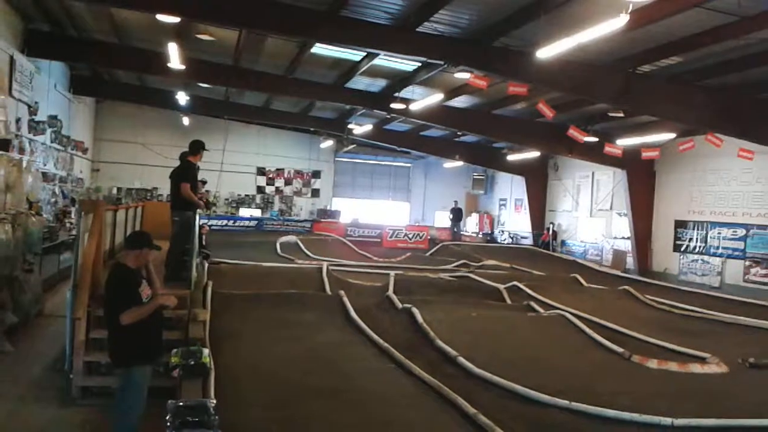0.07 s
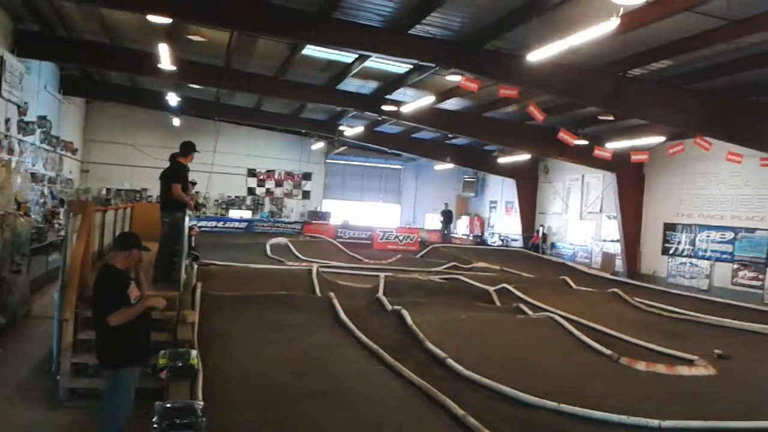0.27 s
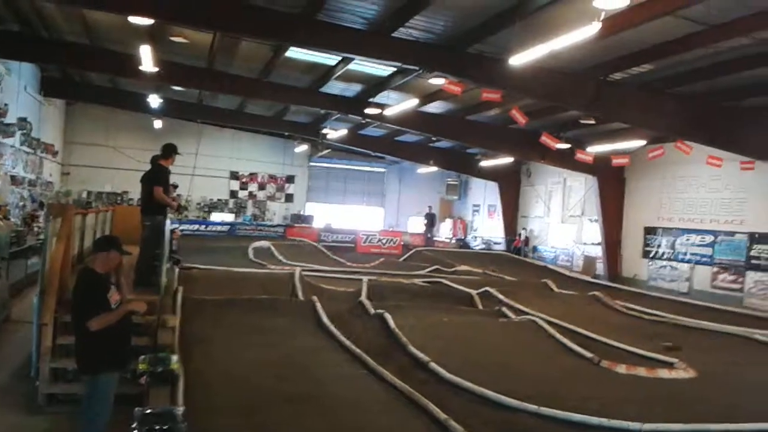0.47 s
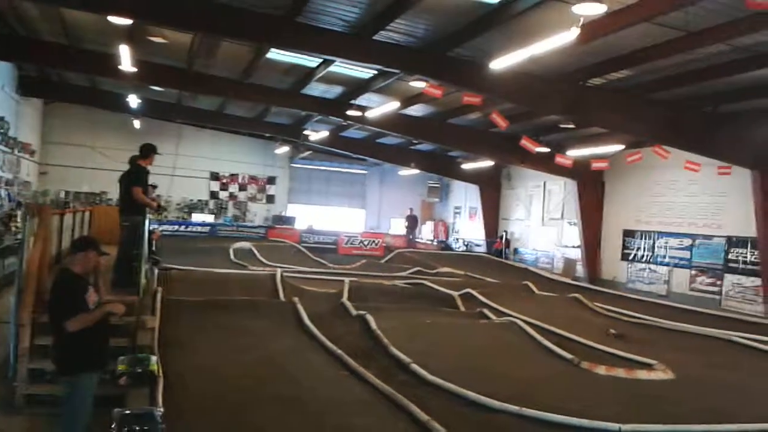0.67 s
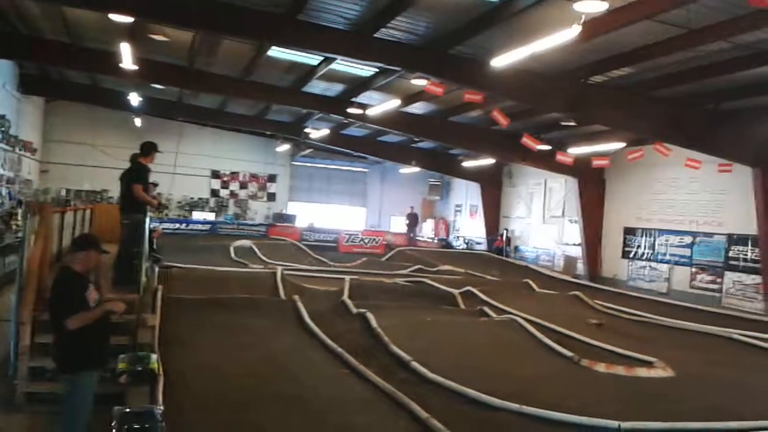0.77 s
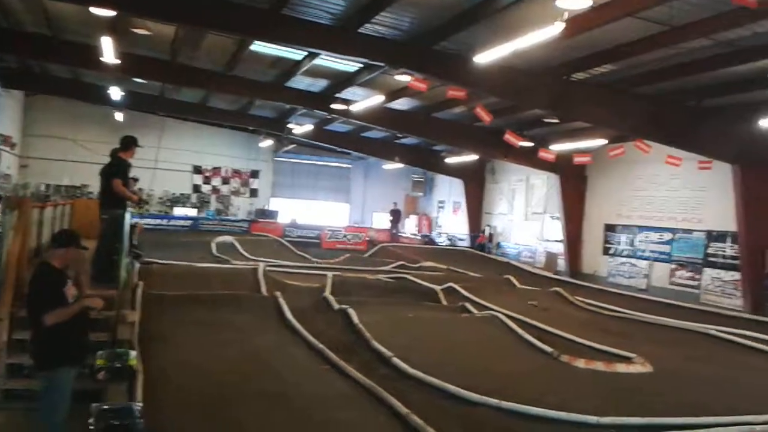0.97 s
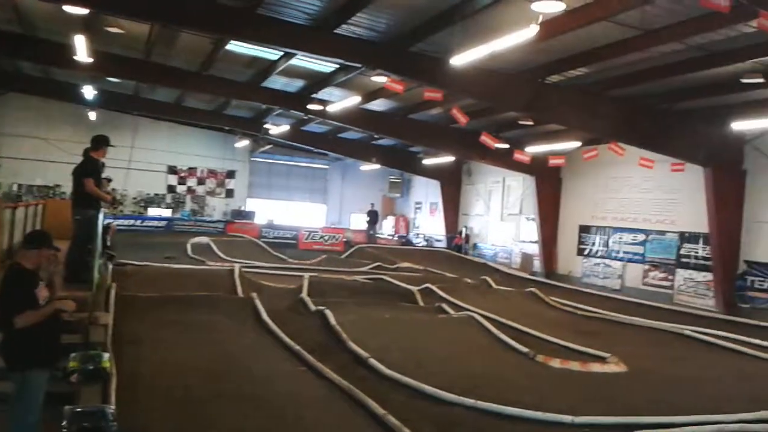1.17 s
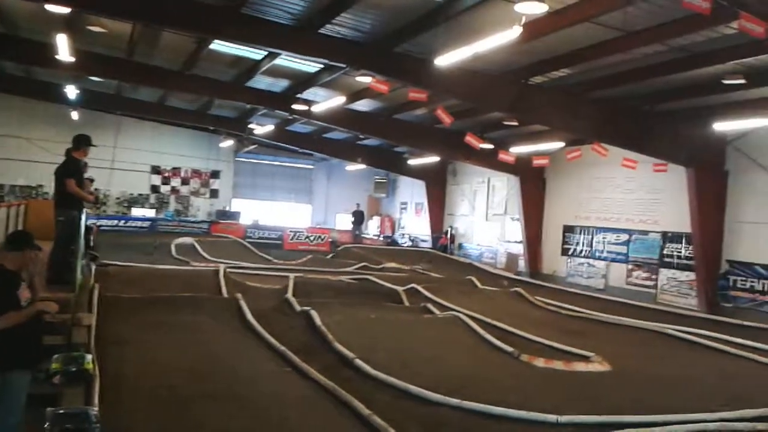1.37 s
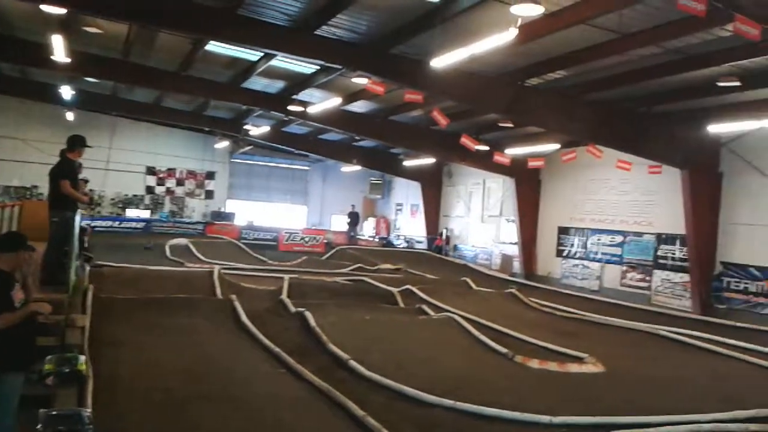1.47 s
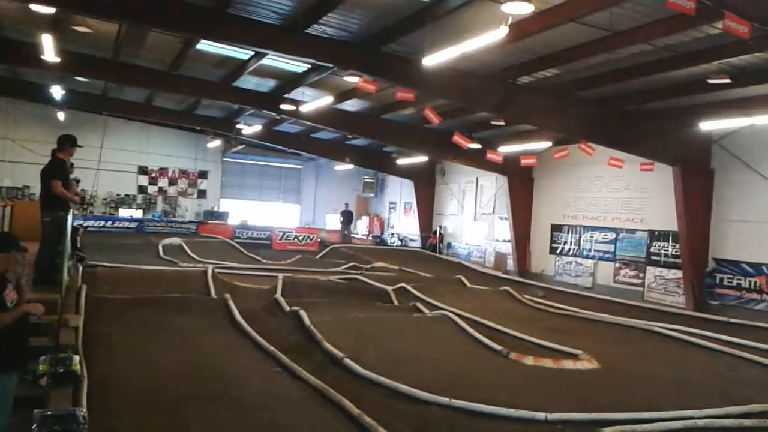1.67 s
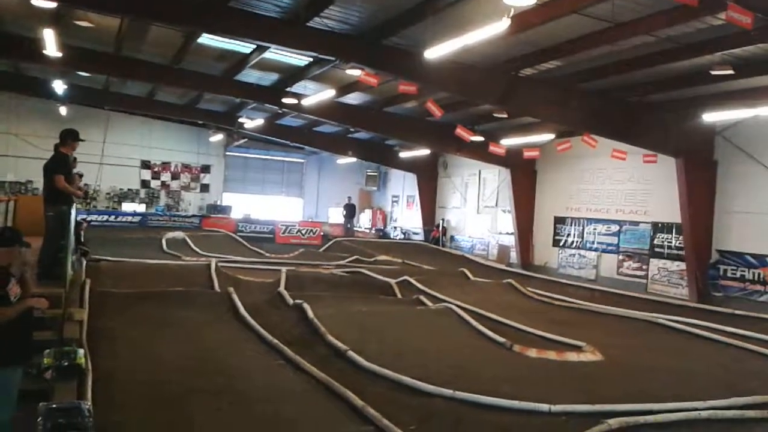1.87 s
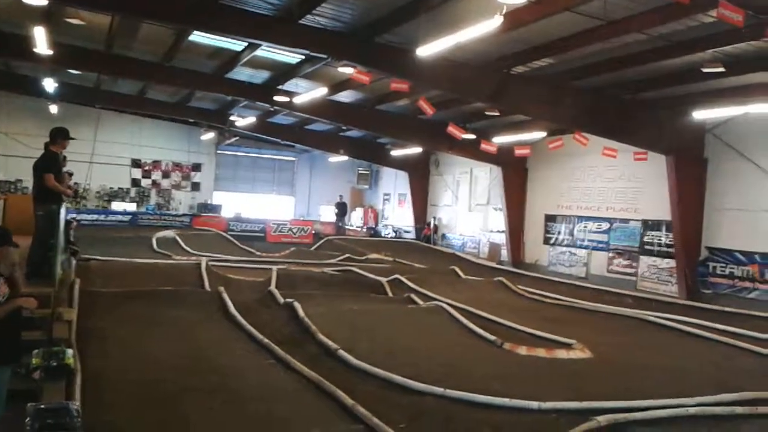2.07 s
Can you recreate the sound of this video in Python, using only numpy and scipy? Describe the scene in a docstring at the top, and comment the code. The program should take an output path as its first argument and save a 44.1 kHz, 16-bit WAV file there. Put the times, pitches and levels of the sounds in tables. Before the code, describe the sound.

Small electric toy race cars whine and buzz around an indoor dirt track in an echoing hall

```python
"""The rough whine of small electric buggies racing round a dirt track in a large steel hall,
heard by one microphone throughout over a wash and a low roar. Each car sounds its final-drive and
motor-gear tooth rates, shaken by bumps. Gears sing out as short rising tones; grit ticks near the
microphone and a thin hiss passes close by. The hall returns a noise tail, tyres and far cars blur
into the flickering wash, and a hum and a drone lie underneath."""
import sys
import numpy as np
from scipy import signal
from scipy.fft import rfft, irfft
from scipy.io import wavfile

SR = 44100
rng = np.random.default_rng(int(sys.argv[2]) if len(sys.argv) > 2 else 0)


def int16_out(signal):
    """Quantize to a 16-bit WAV file."""
    q = np.round(np.clip(np.atleast_2d(signal).T, -1, 1) * 32767)
    wavfile.write(sys.argv[1], SR, q.astype(np.int16))


def amplitude_ratio(level_db):
    """Convert a level in decibels to the matching linear amplitude (field) ratio."""
    exponent = np.asarray(level_db, float) / 20
    return 10 ** exponent


N = 92918

# One table per car, before bumps, wobble and throb:
# start_s [s], drive_pitch_hz [Hz, final-drive teeth], drive_level_db [dB], motor_level_db [dB]
FIRST_CAR_PASS = [(0, 980, -38, -60), (.1, 1060, -41, -36), (.18, 1075, -38, -38), (.26, 1100, -38, -38),
                  (0.331, 1231, -37, -38), (.42, 1144, -41, -38), (.51, 1117, -36.5, -40),
                  (.58, 1225, -35.5, -37), (.65, 1320, -35.5, -38), (.72, 1390, -34.5, -38),
                  (.78, 1350, -35.5, -37), (.83, 1265, -35.5, -39), (.88, 1300, -38, -38),
                  (0.951, 1300, -39.5, -36), (1.02, 1289, -37, -37), (1.121, 1303, -49, -46),
                  (1.3, 1300, -51, -53)]
SECOND_CAR_PASS = [(0, 1280, -61, -40), (0.132, 1310, -60, -43), (0.351, 1360, -44, -38),
                   (.6, 1341, -55, -38), (.8, 1390, -50, -39), (.96, 1411, -42, -38), (1.1, 1400, -47, -42),
                   (1.3, 1458, -43, -42.5), (1.459, 1480, -62, -41), (1.552, 1485, -57, -45),
                   (1.652, 1500, -49, -36), (1.802, 1450, -64, -53)]
THIRD_CAR_PASS = [(1.499, 902, -62, -48), (1.6, 981.7, -39.5, -56), (1.659, 1150, -37, -49),
                  (1.699, 959.3, -35.5, -36.5), (1.735, 1091, -37.5, -42), (1.755, 1028, -34, -40),
                  (1.8, 1120, -35, -37), (1.83, 1220, -37.5, -43), (1.875, 1350, -39.5, -57),
                  (1.915, 989.3, -38, -40), (1.96, 1123, -32.5, -37), (1.994, 980, -44, -44),
                  (2.053, 1052, -34, -52), (2.11, 1207, -40, -64)]
# Second harmonic of each car's final drive against its first: level_db [dB], one per car
DRIVE_OCTAVE = (-11, -14, -7)
# A gear sings out briefly: centre_s [s], pitch_hz [Hz at the centre], peak_db [dB], length_s [s]
GEAR_SQUEAKS = [(.013, 1903, -27, .023), (.035, 1996, -32.5, .05), (.092, 4027, -33, .06),
                (.14, 4900, -30, .047), (.236, 907, -35, .09), (.25, 5050, -35, .05),
                (.268, 1083, -31, .025), (.31, 4950, -33, .03), (.323, 1240, -32, .05),
                (.355, 899, -36, .1), (.371, 4410, -29.5, .057), (.444, 1750, -27, .021),
                (.582, 1215, -32, .04), (.77, 5080, -32, .06), (.879, 1610, -24.5, .044),
                (.976, 1556, -27, .046), (1.013, 1285, -26, .031), (1.461, 5520, -35, .1),
                (1.605, 2260, -31, .046), (1.718, 994, -30, .025), (1.719, 2278, -28.5, .024),
                (1.762, 2290, -34, .025), (1.795, 1094, -28, .025), (1.832, 1220, -31, .018),
                (1.87, 1340, -34, .027), (1.925, 2010, -32, .027), (1.943, 1036, -33, .05),
                (1.993, 2030, -31, .023), (2.04, 1920, -34, .03), (2.055, 1050, -31, .03),
                (2.098, 1800, -31, .02)]
# Grit thrown near the microphone: centre_s [s], level_db [dB rms at the height of the puff]
GRIT_TICKS = [(1.292, -43), (1.4, -47), (1.458, -51), (1.52, -52)]
# Upper and lower thin bands of hiss passing close by, before flicker: start_s [s], level_db [dB]
UPPER_HISS_LEVEL = [(1.5, -80), (1.6, -59), (1.67, -56), (1.76, -56.5), (1.87, -59), (1.95, -75)]
LOWER_HISS_LEVEL = [(1.56, -80), (1.65, -61), (1.7, -66), (1.8, -68), (1.9, -80)]
# Tyres and far cars: start_s [s], level_db [dB before the lift], top_lift_db [dB, gritty top as cars near]
TYRE_WASH_LEVEL = [(0.0, -31, -1.5), (0.82, -29.5, 3), (1.21, -29.5, 0), (1.48, -31.5, 2),
                   (2.1, -27.5, 1.5)]
# Colour of tyres and far cars: pitch_hz [Hz], level_db [relative dB per Hz]
TYRE_WASH_COLOUR = [(150, -49), (300, -21), (502, -10.5), (1060, 0), (1450, -.5), (1960, 2.5), (2430, -1),
                    (3110, -6.5), (4950, -.5), (5560, -3.5), (6250, -10), (7880, -19.5), (9150, -21.5),
                    (12300, -31), (15100, -33), (16500, -33)]
# Low roar of the hall: start_s [s], level_db [dB]
HALL_ROAR_LEVEL = [(0.0, -48), (0.6, -50), (0.66, -56), (0.72, -49), (1.17, -46), (1.68, -49), (1.73, -57),
                   (1.79, -49), (2.1, -50)]
# Colour of the low roar: pitch_hz [Hz], level_db [relative dB per Hz]
HALL_ROAR_COLOUR = [(20, -22), (60, -22), (100, -13), (140, -11), (190, -3.5), (215, -2), (260, 2),
                    (400, -2), (500, 0), (700, -1.5), (950, -4), (1500, -34)]
# Low drone that swells and fades, before wavering: start_s [s], pitch_hz [Hz], level_db [dB]
DRONE_PATH = [(0, 221, -61), (.22, 214.3, -63.5), (.3, 211.6, -50.5), (.4, 213, -61), (.55, 215.2, -61),
              (.65, 220, -64), (.8, 229, -55), (1.1, 236.3, -69), (2.11, 216, -80)]
# Mains hum, before wavering: pitch_hz [Hz], level_db [dB]
MAINS_HUM = [(120, -79)]


def rms_one(x):
    """Brings a signal to rms 1."""
    return x / np.sqrt(np.mean(np.abs(x) ** 2) + 1e-20)


def in_time(rows):
    """Joins each column of a table by straight lines over time."""
    start_s, *columns = np.transpose(rows)
    return [np.interp(np.arange(N) / SR, start_s, column) for column in columns]


def drift(corner_hz):
    """Slow chance of spread 1: noise twice through a one-pole low-pass."""
    r = np.exp(-2 * np.pi * corner_hz / SR)
    noise = rng.standard_normal(N + SR)
    return rms_one(signal.lfilter([1], [1, -2 * r, r * r], noise)[SR:])  # first second settles the filter


def tone(pitch_hz):
    """A sine of peak 1 that follows a moving pitch."""
    return np.sin(2 * np.pi * np.cumsum(pitch_hz) / SR)


def whine(pitch_hz, spread_hz, pure):
    """A tooth tone: a pure share of the power plus random sidebands, rms 1."""
    rough = (drift(spread_hz) + 1j * drift(spread_hz)) / np.sqrt(2)
    envelope = np.sqrt(pure) + np.sqrt(1 - pure) * rough
    carrier = np.exp(2j * np.pi * np.cumsum(pitch_hz) / SR)
    return np.sqrt(2) * np.real(envelope * carrier)


def car(rows, octave_db):
    """Two gear meshes locked to one speed; bumps shake speed and load."""
    motor_gear_ratio = 3.72  # motor-gear tooth rate over final-drive tooth rate
    bumps_hz, bump_db, pitch_wobble = 22, 1.2, .014  # wobble is a share of the pitch
    drive_spread_hz, drive_pure = 75, .62
    motor_spread_hz, motor_pure = 430, .1
    wheel_hz, wheel_depth = 125, .65  # mean throb rate, and depth as a share

    pitch_hz, drive_db, motor_db = in_time(rows)
    pitch_hz = pitch_hz * (1 + pitch_wobble * drift(bumps_hz))
    # An uneven gear throbs the drive whine in step with speed, giving side strands
    throb = 1 + wheel_depth * tone(wheel_hz * pitch_hz / pitch_hz.mean())
    drive = whine(pitch_hz, drive_spread_hz, drive_pure)
    drive = drive + amplitude_ratio(octave_db) * whine(2 * pitch_hz, drive_spread_hz, drive_pure)
    motor = whine(motor_gear_ratio * pitch_hz, motor_spread_hz, motor_pure)
    load = amplitude_ratio(bump_db * drift(bumps_hz))
    return load * (amplitude_ratio(drive_db) * throb * drive + amplitude_ratio(motor_db) * motor)


def squeaks():
    """Gears sing in short bell-shaped swells that climb a little and waver faster the higher they lie."""
    t = np.arange(N) / SR
    spread, rise = .012, .015  # shares of the pitch: random spread, and climb over one length
    out = 0
    for centre_s, pitch_hz, peak_db, length_s in GEAR_SQUEAKS:
        place = np.clip((t - centre_s) / length_s, -2, 2)
        moving_hz = pitch_hz * (1 + spread * drift(pitch_hz / 20) + rise * place)
        out = out + amplitude_ratio(peak_db) * np.exp(-8 * place ** 2) * tone(moving_hz)
    return out


def grit():
    """Grit near the microphone: short bright puffs of high-passed noise."""
    t = np.arange(N) / SR
    puff_s, low_hz = .006, 5000  # time from the height down to 1/e; lower edge of the noise
    high_pass = signal.butter(2, low_hz, "high", fs=SR, output="sos")
    bright = rms_one(signal.sosfilt(high_pass, rng.standard_normal(N)))
    return bright * sum(amplitude_ratio(db) * np.exp(-((t - s) / puff_s) ** 2) for s, db in GRIT_TICKS)


def hiss(level, centre_hz, width_hz):
    """A thin close hiss: band-passed very high noise with a flickering level."""
    edges_hz = [centre_hz - width_hz / 2, centre_hz + width_hz / 2]
    band_pass = signal.butter(2, edges_hz, "band", fs=SR, output="sos")
    band = signal.sosfilt(band_pass, rng.standard_normal(N))
    return amplitude_ratio(in_time(level)[0] + 2.0 * drift(25)) * rms_one(band)


def hall(x):
    """The steel hall answers after a short gap with a dense tail that dies evenly."""
    t60_s, gap_s = 0.9, 0.023
    t = np.arange(SR) / SR
    tail = rng.standard_normal(SR) * amplitude_ratio(-60 * t / t60_s) * (t > gap_s)
    return signal.fftconvolve(x, tail / np.sqrt(np.sum(tail ** 2)))[:N]


def banded_noise(colour, patchiness, flicker_hz):
    """Coloured noise in third-octave bands that flicker partly together, partly alone; rms 1."""
    hz, db = np.transpose(colour)
    f = np.maximum(np.arange(N // 2 + 1) * SR / N, 1)
    colour_db = np.interp(np.log(f), np.log(hz), db, -90, -90)
    whole = rfft(rng.standard_normal(N)) * amplitude_ratio(colour_db)
    together = drift(flicker_hz)
    place = 3 * np.log2(f / 20)  # third-octaves above 20 Hz
    out = 0
    for k in range(30):
        band = irfft(whole * np.clip(1 - abs(place - k), 0, 1), N)  # overlapping triangles
        flicker_db = patchiness * (1.1 * together + .8 * drift(flicker_hz))
        out = out + band * amplitude_ratio(flicker_db)
    return rms_one(out)


def wash():
    """Tyres and far cars: flickering broad noise whose top lifts when cars are near."""
    gritty_top_hz = 6250
    level_db, top_lift_db = in_time(TYRE_WASH_LEVEL)
    noise = banded_noise(TYRE_WASH_COLOUR, patchiness=.9, flicker_hz=15)
    f = np.arange(N // 2 + 1) * SR / N + 1
    top = irfft(rfft(noise) / (1 + (gritty_top_hz / f) ** 8), N)
    return amplitude_ratio(level_db) * (noise + (amplitude_ratio(top_lift_db) - 1) * top)


def hall_roar():
    """The low roar of the hall: coloured noise that flickers slowly."""
    noise = banded_noise(HALL_ROAR_COLOUR, patchiness=1.0, flicker_hz=4)
    return amplitude_ratio(in_time(HALL_ROAR_LEVEL)[0]) * noise


def hum():
    """A mains tone wavering in level and a drone wavering in level and pitch."""
    t = np.arange(N) / SR
    pitch_hz, level_db = in_time(DRONE_PATH)
    drone_level = amplitude_ratio(level_db + 1.1 * drift(4.4))
    out = drone_level * np.sqrt(2) * tone(pitch_hz + 1.96 * drift(13))
    for hz, db in MAINS_HUM:
        out = out + amplitude_ratio(db + 4.6 * drift(4.8)) * np.sqrt(2) * np.sin(2 * np.pi * hz * t)
    return out


def scene():
    """Everything reaches one capsule, so both channels are alike."""
    passes = (FIRST_CAR_PASS, SECOND_CAR_PASS, THIRD_CAR_PASS)
    cars = sum(car(rows, db) for rows, db in zip(passes, DRIVE_OCTAVE)) + squeaks()
    close = grit() + hiss(UPPER_HISS_LEVEL, centre_hz=14400, width_hz=2000)
    close = close + hiss(LOWER_HISS_LEVEL, centre_hz=10900, width_hz=1000)
    reverberation = amplitude_ratio(-8) * hall(cars)
    background = wash() + hall_roar() + hum()
    mono = cars + close + reverberation + background
    return np.stack([mono, mono])


def band_limit(x):
    """A steep low-pass at the top of the band."""
    return signal.sosfilt(signal.butter(12, 15970, fs=SR, output="sos"), x)


def record(dry):
    """Cuts the rumble and the extreme top of the microphone signal."""
    low_cut_hz, top_cut_hz = 45, 15950
    low_cut = signal.butter(2, low_cut_hz, "high", fs=SR, output="sos")
    top_cut = signal.cheby2(24, 50, top_cut_hz, fs=SR, output="sos")
    mix = signal.sosfilt(top_cut, signal.sosfilt(low_cut, dry))
    return band_limit(mix)


dry = scene()
out = record(dry)
int16_out(out)
```